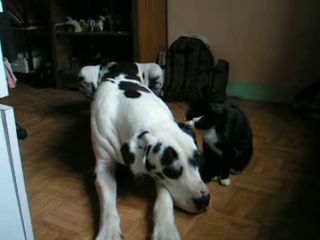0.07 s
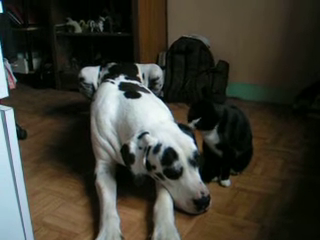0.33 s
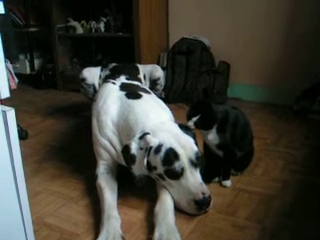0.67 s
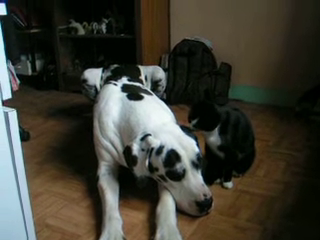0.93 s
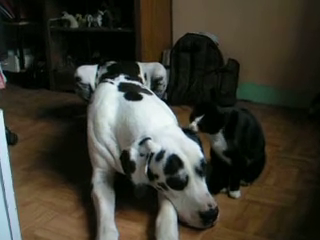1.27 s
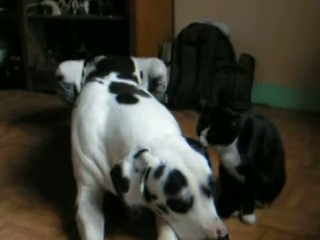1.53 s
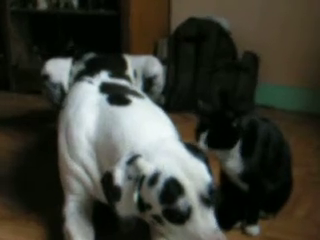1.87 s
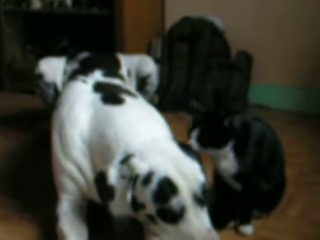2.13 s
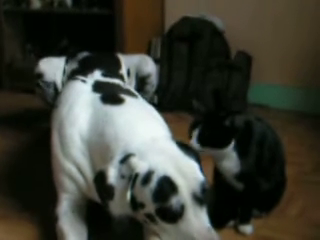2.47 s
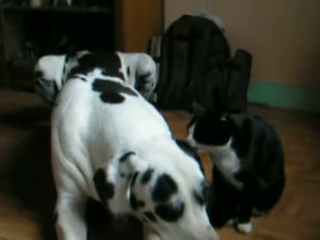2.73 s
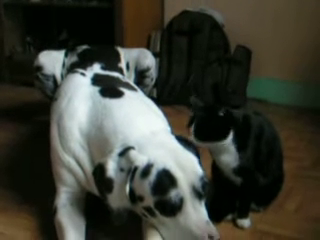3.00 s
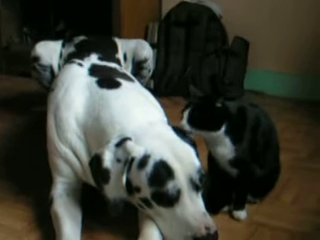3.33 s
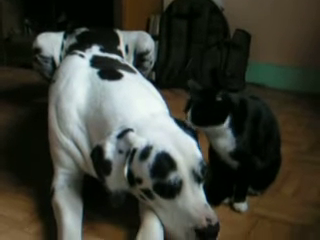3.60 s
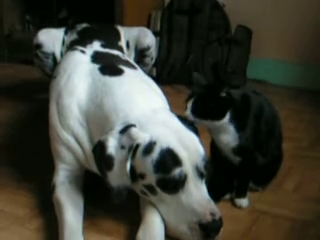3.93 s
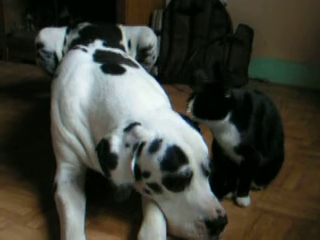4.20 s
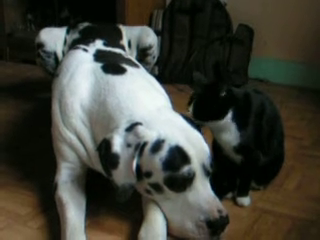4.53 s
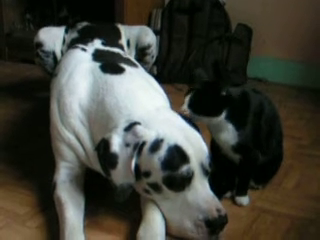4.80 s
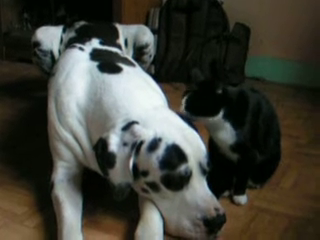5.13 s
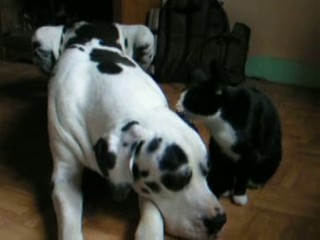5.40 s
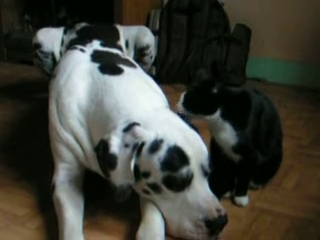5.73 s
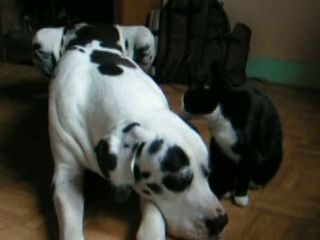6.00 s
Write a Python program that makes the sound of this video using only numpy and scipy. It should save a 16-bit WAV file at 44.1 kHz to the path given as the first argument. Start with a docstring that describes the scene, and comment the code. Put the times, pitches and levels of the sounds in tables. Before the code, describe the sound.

Over steady hiss and hum, camera lens ticks and one loud control click give way to the soft rubbing of a cat against a dog.

```python
"""Steady hiss and the hum of an appliance fill a quiet room, and soon a small camera ticks in pairs.
Its lens drive jolts the gears as each step starts and stops, and the zoom motor whirs twice.
Fur rubs faintly now and then as a cat nuzzles a resting dog, ending in one long, brighter brush.
The loudest sound is a control that snaps once and excites the resonances of the camera's case."""
import sys
import numpy as np
from scipy import signal
from scipy.fft import rfft, irfft
from scipy.io import wavfile

SR = 44100
rng = np.random.default_rng(int(sys.argv[2]) if len(sys.argv) > 2 else 0)


def dump(signal):
    """Clip the signal to [-1, 1] and save it as 16-bit WAV at the path in sys.argv[1]."""
    limited = np.clip(np.atleast_2d(signal).T, -1, 1)
    pcm = np.round(limited * 32767).astype(np.int16)
    wavfile.write(sys.argv[1], SR, pcm)


N = 276066


def amp(db):
    """Amplitude ratio of a level in decibels."""
    return 10 ** (np.asarray(db) / 20)


def unit_rms(x):
    """Normalisation to an rms of 1."""
    return x / np.sqrt(np.mean(x ** 2) + 1e-20)


def add(mix, start_s, sound):
    """Superposition: a sound joins the mix at start_s."""
    part = mix[max(round(start_s * SR), 0):][:len(sound)]
    part += sound[:len(part)]


def shaped_noise(spectrum, size):
    """Spectral shaping: white noise weighted by (frequency_hz, relative_db) points, at rms 1."""
    points_hz, points_db = np.transpose(spectrum)
    hz = np.fft.rfftfreq(size, 1 / SR)
    gain = amp(np.interp(np.log(hz + 1), np.log(points_hz), points_db))
    return unit_rms(irfft(rfft(rng.standard_normal(size)) * gain, size))


def band_noise(centre_hz, width_hz, size):
    """Band-pass filtering: white noise confined to one resonance, at rms 1."""
    hz = np.fft.rfftfreq(size, 1 / SR)
    attenuation = np.sqrt(1 + (2 * (hz - centre_hz) / width_hz) ** 4)
    return unit_rms(irfft(rfft(rng.standard_normal(size)) / attenuation, size))


def swell(t, peak_s):
    """Critically damped envelope: it rises from t = 0 to 1 at peak_s and dies away."""
    u = np.maximum(t, 0) / peak_s
    return u * np.exp(1 - u)


def minimum_phase(gain):
    """Causality: the spectrum of the earliest possible response with this gain at each frequency."""
    cepstrum = irfft(np.log(np.maximum(gain, 1e-4)))
    half = len(cepstrum) // 2
    cepstrum[1:half] *= 2
    cepstrum[half + 1:] = 0
    return np.exp(rfft(cepstrum))


def friction(strokes, centre_hz, width_hz, grain, grain_hz):
    """Sliding friction: small catches modulate a band of noise that swells and fades in each stroke."""
    out = np.zeros(N)
    for middle_s, length_s, level_db in strokes:
        size = round(length_s * SR)
        catches = np.exp(grain * band_noise(0, grain_hz, SR)[:size])
        rub = unit_rms(catches * band_noise(centre_hz, width_hz, SR)[:size])
        add(out, middle_s - length_s / 2, amp(level_db) * rub * np.hanning(size) ** .5)
    return out


# Spectral density of the hiss: frequency_hz, relative_db
HISS_SPECTRUM = [(190, -40), (330, -12.5), (392, -5.5), (423, -9.5), (447, -1.5), (482, -5.5), (612, -7),
                 (690, -8), (720, -6), (777, -9), (904, -8.5), (986, -10), (2850, -13), (3700, -17.5),
                 (4400, -35), (5720, -66.5), (9680, -120)]

def room_hiss(level_db=-48.5):
    """Stationary noise: an unchanging spectrum is heard as steady hiss."""
    return amp(level_db) * shaped_noise(HISS_SPECTRUM, N)


# Spectral density of the appliance's air noise: frequency_hz, relative_db
AIR_SPECTRUM = [(20, -4), (45, -10), (95, -11), (150, -8.5), (190, -3), (250, 2), (295, 1), (340, -7),
                (450, -32), (900, -53.5)]
# Tones of its motor: pitch_hz, rms_level_db
MOTOR_TONES = [(120, -70.5), (205, -60.5), (245, -70), (279.6, -56.5), (299, -65), (455.5, -60.5),
               (737.5, -64), (1821, -68), (2878, -73.5)]

def appliance(air_db=-52, waver=.2, waver_hz=3.0, drift_rad=.5):
    """Slow random modulation of amplitude and phase makes motor tones waver over low air noise."""
    t = np.arange(N) / SR
    out = amp(air_db) * shaped_noise(AIR_SPECTRUM, N)
    for pitch_hz, level_db in MOTOR_TONES:
        phase = 2 * np.pi * (pitch_hz * t + rng.random()) + drift_rad * band_noise(0, waver_hz, N)
        envelope = 1 + waver * band_noise(0, waver_hz, N)
        out += np.sqrt(2) * amp(level_db) * envelope * np.sin(phase)
    return out


# Short rubs of fur: middle_s, length_s, level_db
FUR_RUBS = [(.54, .04, -53), (3.095, .04, -54), (3.782, .048, -50), (3.905, .075, -46), (4.165, .14, -50.5),
            (4.97, .078, -56)]

def fur_rubs():
    """Friction of fur on fur gives brief, narrow bands of noise."""
    return friction(FUR_RUBS, centre_hz=1140, width_hz=165, grain=.43, grain_hz=150)


def fur_brush(start_s=5.485, rise_s=.08, level_db=-50, grain=.3, grain_hz=150):
    """Friction in one slow stroke over fur gives brighter noise with a quick rise and a long release."""
    catches = np.exp(grain * band_noise(0, grain_hz, N))
    rub = unit_rms(catches * band_noise(centre_hz=2200, width_hz=640, size=N))
    return amp(level_db) * swell(np.arange(N) / SR - start_s, rise_s) * rub


# Runs of the zoom motor: middle_s, length_s, level_db
ZOOM_RUNS = [(1.275, .083, -48.5), (1.547, .1, -50)]

def zoom_whir():
    """Friction noise with a fine grain is heard as a whir while the zoom motor runs."""
    return friction(ZOOM_RUNS, centre_hz=2950, width_hz=600, grain=.2, grain_hz=300)


# Modes of the lens gears: pitch_hz, relative_db, rise_s
GEAR_MODES = [(2060, -6.5, 0.0011), (2560, -2, .0011), (2900, -3, .0009), (3320, -6.5, .0007),
              (3920, -13, 0.0013)]

def gear_jolt(t):
    """An impact excites the gears' modes, which sum to a tick of peak 1."""
    jolt = np.zeros(len(t))
    for pitch_hz, relative_db, rise_s in GEAR_MODES:
        detuned_hz = pitch_hz * rng.uniform(.95, 1.03)  # the teeth never meet in quite the same way
        jolt += amp(relative_db) * swell(t, rise_s) * np.sin(2 * np.pi * (detuned_hz * t + rng.random()))
    return jolt / abs(jolt).max()


# Firm steps of the lens drive: start_s, level_db
FIRM_LENS_STEPS = [(.2035, -38), (.6025, -36.5), (1.202, -37), (1.602, -37), (1.801, -39), (2.002, -38),
                   (2.201, -38), (2.402, -43), (3.401, -38.5)]

def tick_schedule(first_s=.204, last_s=3.404, period_s=.2, step_s=.124, light_db=-45.5, stop_gain_db=-1):
    """Periodic stepping: each step, firm or light, ticks as it starts and again as it stops."""
    clock = np.arange(first_s, last_s + period_s / 2, period_s)
    light = [(start_s, light_db) for start_s in clock
             if all(abs(start_s - firm_s) > period_s / 2 for firm_s, _ in FIRM_LENS_STEPS)]
    starts = list(FIRM_LENS_STEPS) + light
    stops = [(start_s + step_s, level_db + stop_gain_db) for start_s, level_db in starts]
    return starts + stops


# Spectral density of the gears' rattle: frequency_hz, relative_db
RATTLE_SPECTRUM = [(300, -25), (800, -8.5), (1300, -2.5), (1650, -21), (2000, 0.5), (2250, -4), (2500, 2.5),
                   (2900, -4), (3300, -6), (3600, -8), (3850, -7.5), (4300, -20)]

def lens_ticks(jolt_gain_db=5.5, rattle_gain_db=-4.5, ring_gain_db=-10, rebound_s=.008, rebound_share=.4):
    """Impact and rebound: each start or stop jolts the gears, which bounce, rattle and ring the case."""
    out, t = np.zeros(N), np.arange(4096) / SR
    for start_s, level_db in tick_schedule():
        for delay_s, share in ((0, 1), (rebound_s * rng.uniform(.7, 1.3), rebound_share)):
            add(out, start_s + delay_s, share * amp(level_db + jolt_gain_db) * gear_jolt(t))
        rattle = amp(rattle_gain_db) * swell(t, peak_s=.004) * shaped_noise(RATTLE_SPECTRUM, len(t))
        ring_hz = 1050 * rng.uniform(.94, 1.03)
        ring = amp(ring_gain_db) * swell(t - .002, peak_s=.0054) * np.sin(2 * np.pi * ring_hz * t)
        add(out, start_s - .0005, amp(level_db) * (rattle + ring))
    return out


# Scrape of the control: middle_s, length_s, level_db
CONTROL_SCRAPE = [(1.9835, .014, -42.5)]

def control_scrape():
    """Friction: the control scrapes under the finger just before it snaps."""
    return friction(CONTROL_SCRAPE, centre_hz=3050, width_hz=800, grain=.3, grain_hz=400)


# Resonances of the camera's case: centre_hz, width_hz, relative_db
CASE_MODES = [(139.2, 180, -20.5), (427, 200, -8), (703, 88, -10.5), (860, 90, -8.5), (1087, 160, -1.5),
              (1580, 300, -9), (2280, 150, -13), (2705, 230, -2), (2910, 260, 0), (3250, 280, -4.5),
              (3600, 220, -8.5), (4160, 220, -23)]

def control_snap(start_s=2.002, peak=.83, lag_s=.00137, lag_below_hz=2000, tail_db=-39, ring_db=-37):
    """Impulse response of the case: stiff high modes answer before heavy low ones; a faint ring lingers."""
    out, t = np.zeros(N), np.arange(8192) / SR
    hz = np.fft.rfftfreq(len(t), 1 / SR)
    power = sum((amp(relative_db) / (1 + (2 * (hz - centre_hz) / width_hz) ** 2)) ** 2
                for centre_hz, width_hz, relative_db in CASE_MODES)
    lead_s = .01  # room ahead of the onset
    group_delay_s = lead_s + lag_s / (1 + (hz / lag_below_hz) ** 8)
    phase = -2 * np.pi * (np.cumsum(group_delay_s) - group_delay_s[0]) * hz[1]
    case = irfft(minimum_phase(np.sqrt(power)) * np.exp(1j * phase))
    add(out, start_s - lead_s, peak * case / abs(case).max())
    tail = swell(t, peak_s=.0095) * band_noise(centre_hz=3100, width_hz=830, size=len(t))
    ring = swell(t, peak_s=.0089) * band_noise(centre_hz=1060, width_hz=250, size=len(t))
    add(out, start_s, amp(tail_db) * tail + amp(ring_db) * ring)
    return out


def scene():
    """Superposition of the room, the animals and the camera's own noises in one channel."""
    room = room_hiss() + appliance()
    fur = fur_rubs() + fur_brush()
    lens = lens_ticks() + zoom_whir()
    control = control_scrape() + control_snap()
    return (room + fur + lens + control)[None]


def low_pass(x, cutoff_hz):
    """Linear-phase filtering removes the treble above cutoff_hz."""
    taps = signal.firwin(301, cutoff_hz, window=("kaiser", 8), fs=SR)
    return signal.oaconvolve(x, taps[None], "same")


def record(dry, offset=.035, ceiling=.71):
    """Band limiting and clipping: the narrow-band signal sits off zero, and the snap just overloads."""
    narrow = low_pass(dry, cutoff_hz=4230)
    clipped = np.clip(narrow + offset, -ceiling, ceiling)
    return low_pass(clipped, cutoff_hz=16000)


dry = scene()
out = record(dry)
dump(out)
```